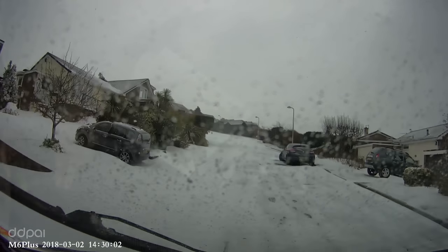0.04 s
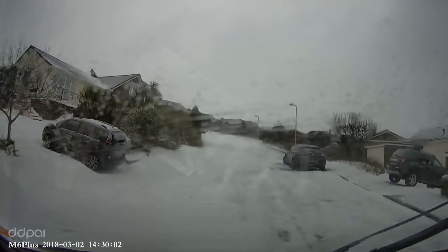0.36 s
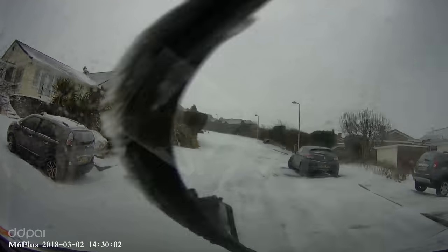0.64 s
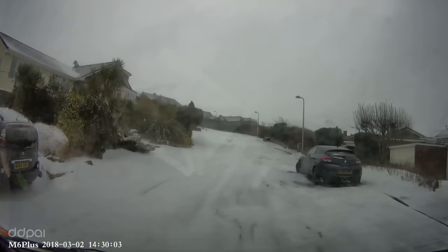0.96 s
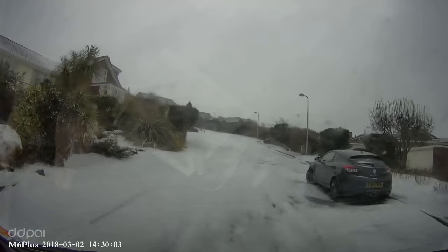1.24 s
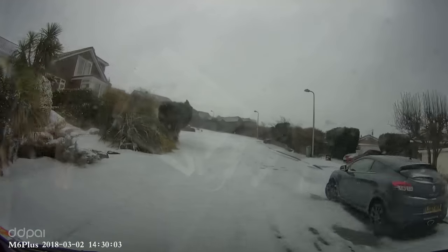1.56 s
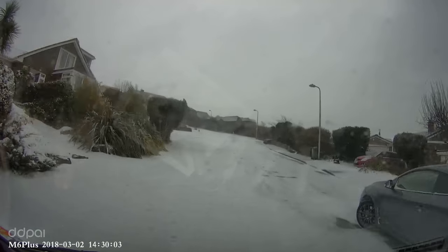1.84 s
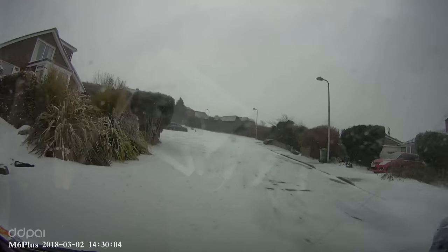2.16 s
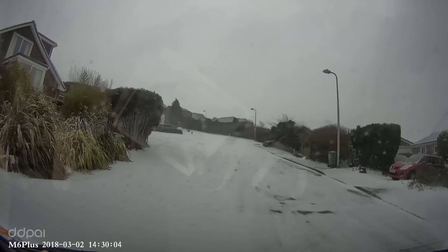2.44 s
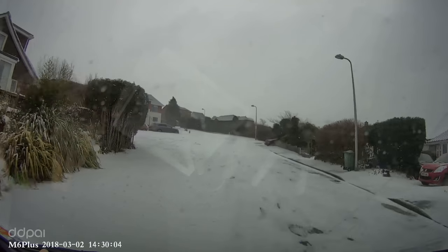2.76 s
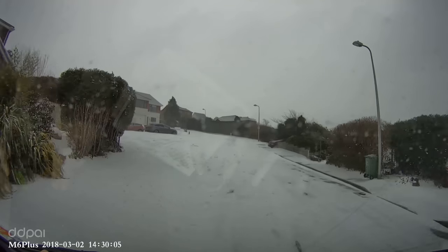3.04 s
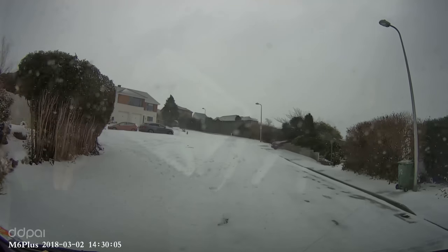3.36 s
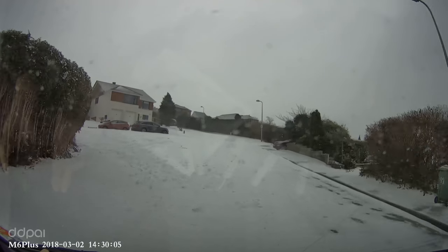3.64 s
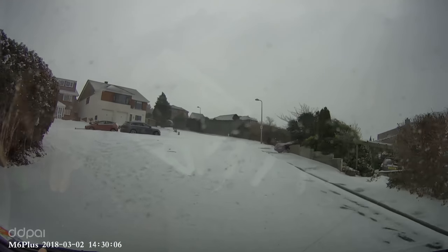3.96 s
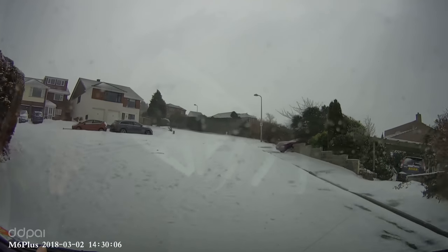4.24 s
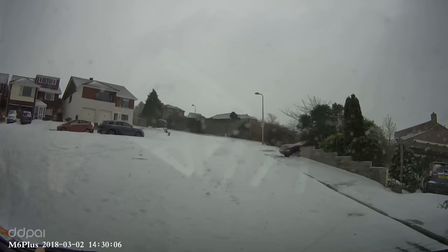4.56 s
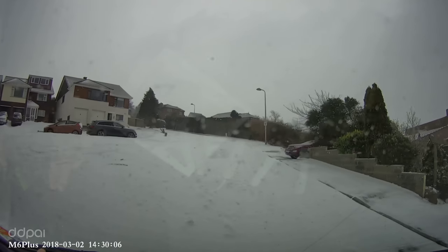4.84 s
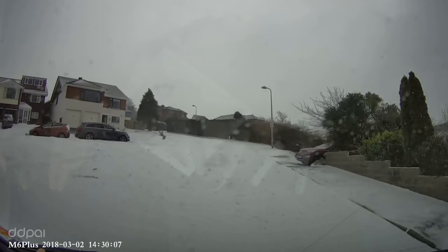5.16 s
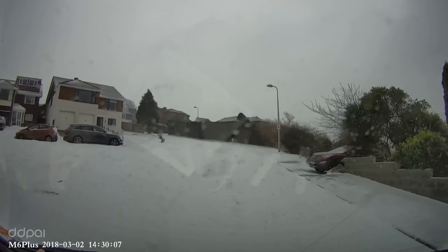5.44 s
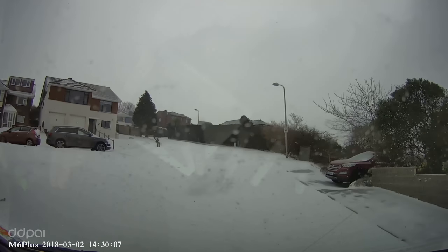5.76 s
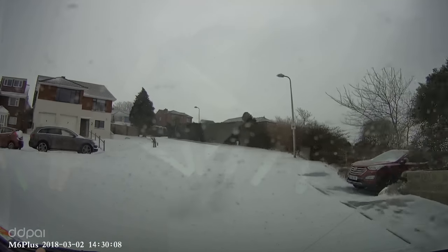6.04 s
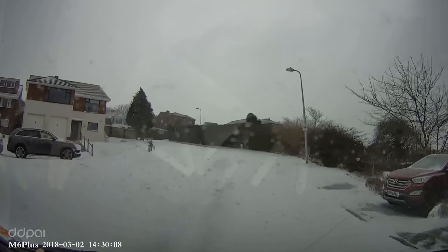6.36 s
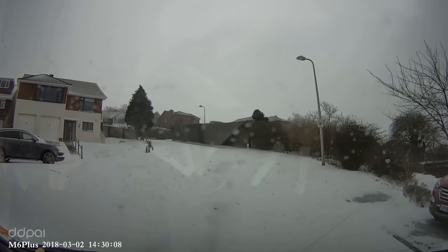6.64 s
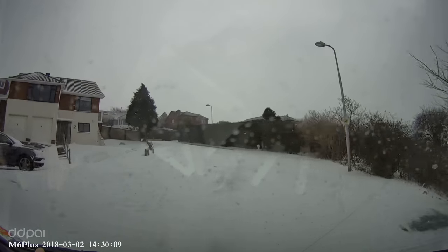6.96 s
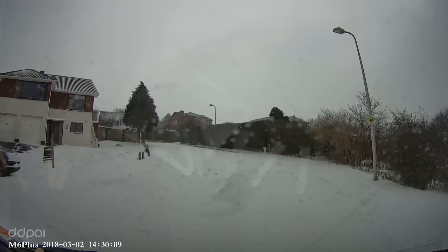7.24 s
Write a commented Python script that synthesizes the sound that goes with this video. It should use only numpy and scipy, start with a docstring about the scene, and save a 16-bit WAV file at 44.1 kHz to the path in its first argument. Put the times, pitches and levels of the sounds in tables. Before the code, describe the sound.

A short rubbery wiper groan, a bump and a sharp switch click open over the steady low rumble of a van's engine and tyres on packed snow. The heater blows quietly, with faint swishes of slush and a thin whine. From about halfway the ride gets bumpier, with dull knocks, small trim ticks and thumps that briefly overload the microphone. All is heard from the windscreen inside the cabin.

```python
"""Inside a van driving slowly up a snowy street, heard by a small microphone on the windscreen.
The heater blows, slush sprays, and packed snow shakes the body through the rumbling tyres.
The engine's firing makes the cabin boom; belt drive and gearbox whine faintly. The wipers groan
by stick-slip friction, then bump and scrape across the glass, and their stalk clicks off.
Trim ticks, lumps of snow knock underneath, and jolts briefly overload the microphone."""
import sys
import numpy as np
from scipy import signal
from scipy.fft import rfft, irfft
from scipy.io import wavfile
from scipy.ndimage import uniform_filter1d

SR = 44100
rng = np.random.default_rng(int(sys.argv[2]) if len(sys.argv) > 2 else 0)


def store_pcm(level_fs):
    """Save levels as 16-bit WAV."""
    pcm = np.round(np.clip(level_fs, -1, 1) * 32767).astype(np.int16)
    wavfile.write(sys.argv[1], SR, np.atleast_2d(pcm).T)


N = 326781
TIME = np.arange(N) / SR
FREQ = np.fft.rfftfreq(N, 1 / SR)


def amp(db):
    """Amplitude ratio of a level in decibels."""
    return 10 ** (np.asarray(db) / 20)


def unit(x):
    """Normalisation to rms 1."""
    return x / np.sqrt(np.mean(x ** 2) + 1e-20)


def curve(rows, column=1):
    """Linear interpolation of a table column over time."""
    columns = np.transpose(rows)
    return np.interp(TIME, columns[0], columns[column])


def add(mix, start_s, sound):
    """Superposition of a sound on the mix."""
    part = mix[max(round(start_s * SR), 0):][:len(sound)]
    part += sound[:len(part)]


def colour(x, spectrum):
    """Spectral shaping by (f/Hz, level/dB) points, with a steep roll-off beyond the ends."""
    hz, db = np.transpose(spectrum)
    log_f = np.log(np.fft.rfftfreq(len(x), 1 / SR) + 1)
    outside = np.maximum(np.log(hz[0]) - log_f, 0) + np.maximum(log_f - np.log(hz[-1]), 0)
    shape_db = np.interp(log_f, np.log(hz), db) - 60 * outside
    return irfft(rfft(x) * amp(shape_db), len(x))


def noise(spectrum, size=N):
    """Gaussian noise of rms 1 with a given spectral shape."""
    return unit(colour(rng.standard_normal(size), spectrum))


def drift(cutoff_hz):
    """Random modulation: low-pass noise of rms 1."""
    return unit(irfft(rfft(rng.standard_normal(N)) * (FREQ > 0) * np.exp(-(FREQ / cutoff_hz) ** 2), N))


def phase(hz):
    """Phase as the integral of frequency, from a random start."""
    return 2 * np.pi * (np.cumsum(hz) / SR + rng.random())


def ring(modes, size=8000):
    """Free vibration as a sum of damped modes."""
    t = np.arange(size) / SR
    return sum(amp(db) * np.exp(-np.log(1000) * t / t60) * np.sin(2 * np.pi * hz * t)
               * rng.choice([-1, 1]) for hz, db, t60 in modes)


def burst(spectrum, t60, size=8192):
    """Densely overlapping modes, treated as exponentially decaying noise."""
    return noise(spectrum, size) * np.exp(-np.log(1000) * np.arange(size) / SR / t60)


def spell(start, end, rise_s=0.086, fall_s=0.11):
    """Trapezoidal envelope of a tone."""
    return np.clip((TIME - start) / rise_s, 0, 1) * np.clip(1 - (TIME - end) / fall_s, 0, 1)


def softened(sound, rise_s):
    """Linear onset of a soft impact."""
    return sound * np.minimum(TIME[:len(sound)] / rise_s, 1)


def heater(level_db=-51, flutter_db=.5, half_width_hz=55):
    """Flow noise from the demister vents, coloured by duct resonances."""
    airflow = [(400, -5), (950, 1.5), (1450, -1), (1650, -3.5), (1950, -3), (2130, -0.5), (2430, -6),
               (2650, -3), (3200, -11), (4400, -17), (5000, -21.5), (6800, -27.5), (7600, -27.5),
               (8600, -34.5)]  # spectrum of the rushing air: f/Hz, level/dB
    ducts = [(1200, 2.5), (1460, 2.5), (1770, 1.5), (2130, 4), (2320, 5), (2530, 5.5), (2920, 3), (3390, 2),
             (3670, 2), (4420, 2)]  # resonances: f/Hz, gain/dB
    lift_db = sum(db * np.exp(-((FREQ - hz) / half_width_hz) ** 2) for hz, db in ducts)
    return amp(level_db + flutter_db * drift(40)) * unit(irfft(rfft(noise(airflow)) * amp(lift_db), N))


def slush(rise_s=.18, fall_s=.13, spatter_db=2.0):
    """Spray as amplitude-modulated noise: each patch of slush swells and decays in a spattering hiss."""
    patches = [(0.048, -62, 0.93), (.65, -68, 1), (2.3, -77.5, 0.93), (2.8, -71.5, 1), (3.73, -62, 0.99),
               (4.95, -65, 0.92), (6.08, -64, .7), (6.33, -68.5, .6), (6.69, -63.5, 0.88)]  # deepest points: t/s, level/dB, frequency ratio
    spray = [(1000, -3), (1800, 2), (3000, 0.5), (4400, 0), (5200, -2.5), (6500, -1.5), (7500, -2.5),
             (8600, -11)]  # spectrum of the hiss: f/Hz, level/dB
    out = np.zeros(N + SR)
    t = np.arange(2 * SR) / SR - 1  # one second either side of the deepest point
    swell = np.exp(-np.maximum(-t / rise_s, t / fall_s))
    for s, db, brightness in patches:
        hiss = noise([(hz * brightness, level) for hz, level in spray], len(t))
        add(out, s, amp(db) * swell * hiss)
    return out[SR:] * unit(amp(spatter_db * drift(80)))


def clods(level_db=-53, per_s=45, spread_db=1.5):
    """Shot noise: small clods thrown by the tread pat the underbody at random."""
    pat = [(300, 2.5), (550, -2.0), (800, -4.0), (1100, -16.5), (1600, -27.0)]  # f/Hz, level/dB
    strength = amp(spread_db * np.minimum(rng.exponential(1, N), 3))
    impacts = (rng.random(N) < per_s / SR) * rng.choice([-1, 1], N)
    return amp(level_db) * unit(colour(strength * impacts, pat))


def rattles(tick_db=-2, knock_db=-2):
    """Impact excitation: loose trim ticks, and soft lumps of snow set the wheel arches ringing."""
    ticks = [(.1, -56, 4200, .03), (0.61, -42, 4600, 0.037), (.616, -42, 4400, 0.023),
             (4.9055, -33, 2230, 0.024), (4.943, -45, 4700, .025), (5.1255, -44, 1990, 0.029),
             (5.709, -37.5, 2100, 0.034), (6.053, -43, 2200, 0.042), (6.281, -41, 1950, 0.04),
             (6.361, -44, 1900, .03), (6.45, -44, 2310, .03), (6.641, -42.5, 2000, .05),
             (6.707, -53, 2280, .04)]  # trim impacts: t/s, level/dB, centre f/Hz, T60/s
    knocks = [(0.611, -23), (1.069, -34), (2.174, -29), (3.338, -21), (3.401, -30), (4.68, -24.5)]  # snow impacts: t/s, level/dB
    arch_modes = [(398, 3, .03), (740, -3, 0.037), (814, -9, 0.05)]  # wheel arch: f/Hz, level/dB, T60/s
    splat = [(300, -3), (550, 0), (850, -5), (1100, -15.5), (1600, -23.5)]  # spectrum of a soft lump: f/Hz, level/dB
    tick_shape = [(.5, -12), (1, 0), (1.3, -12), (2, -16), (2.34, -21), (3, -24)]  # f/centre, level/dB
    out = np.zeros(N)
    for s, db, hz, t60 in ticks:
        tick = burst([(hz * ratio, level) for ratio, level in tick_shape], t60)
        add(out, s, amp(db + tick_db) * softened(tick, rise_s=.0013))
    for s, db in knocks:
        knock = ring(arch_modes, size=8192) + amp(-6) * burst(splat, t60=.03)
        add(out, s, amp(db + knock_db) * softened(knock, rise_s=.003))
    return out


def belt_drive(wobble=.0008, whine_waver_db=2.5, hum_waver_db=4.0):
    """A tone and its subharmonic: the belt sings in spells over a hum an octave below."""
    pitch = [(.9, 580), (1.4, 571), (2.5, 583), (3.3, 576), (4.05, 585), (6.7, 590), (7.41, 582)]  # whine: t/s, f/Hz
    spells = [(0.45, 1.697, -46, -45), (1.743, 2.206, -46.5, -33), (2.248, 2.763, -41.5, -42),
              (2.802, 4.048, -43.5, -43), (6.596, 7.5, -48.5, -62)]  # start t/s, end t/s, whine level/dB, hum level/dB
    pulley = phase(curve(pitch) * (1 + wobble * drift(5.1)))
    whine = amp(whine_waver_db * drift(4)) * np.sin(pulley)
    hum = amp(hum_waver_db * drift(2.4)) * np.sin(pulley / 2)
    return sum(spell(start, end) * (amp(whine_db) * whine + amp(hum_db) * hum)
               for start, end, whine_db, hum_db in spells)


def gearbox(start_s=6.45, mesh_hz=426, sag_hz_per_s=10, swell_db_per_s=13.5):
    """Gear-mesh tones: on the climb a whine swells and sinks in pitch, and a lower gear hums along."""
    climb_s = np.maximum(TIME - start_s, 0)
    mesh = phase(mesh_hz - sag_hz_per_s * climb_s)
    whine = amp(-48.5 + swell_db_per_s * climb_s) * np.sin(mesh)
    hum = amp(-39) * np.sin(.603 * mesh)
    return spell(start_s, TIME[-1]) * (whine + hum)


def tyres(lumps_db=0.8):
    """Structure-borne noise grows with the snow's unevenness; smooth snow crunches a little more."""
    unevenness = [(0, 0.5), (.9, -3), (2.45, -5), (2.7, -1), (3.5, 0.5), (3.9, 3), (4.4, 0.5), (5.12, -0.5),
                  (5.35, 5), (5.8, 4), (6.4, 5), (6.7, -3), (6.95, -4.5), (7.15, -3), (7.41, 1)]  # packed snow: t/s, level/dB
    body = [(10, -19.5), (18, -3), (25, 2), (31, 0), (39, 7), (50, -7.5), (62, -11), (90, -31.5)]  # spectrum of the shaking body: f/Hz, level/dB
    floor = [(45, -12.5), (56, -7), (65, -1.5), (76, -6.5), (92, -5.5), (115, -15)]  # spectrum of the drumming floor: f/Hz, level/dB
    tread = [(55, -22), (80, -9.5), (100, -3.5), (125, 1), (155, -4.5), (220, -3.5), (320, -9.5),
             (420, -11), (520, -21), (700, -36.5)]  # spectrum of the rolling tread: f/Hz, level/dB
    snow = [(300, -18), (450, -3), (560, -3.5), (660, -6), (760, -16.5), (900, -20.5), (1200, -33.5),
            (2000, -50)]  # spectrum of the crunching snow: f/Hz, level/dB
    uneven_db = curve(unevenness)
    shake = amp(-34 + .49 * uneven_db) * noise(body)
    drum = amp(-34.5 + .7 * uneven_db) * noise(floor)
    rumble = amp(-30.5 + .16 * uneven_db) * noise(tread)
    crunch = amp(-44 - .05 * uneven_db) * unit(noise(snow) * amp(lumps_db * drift(49)))
    return shake + drum + rumble + crunch


def engine(throb_db=1.15, waver_db=3, jitter=0.003):
    """Forced vibration: four cylinders drive the cabin at the firing rate and at weaker orders."""
    firing_rate = [(0, 73), (1.2, 75), (2.0, 76.5), (3.5, 75.5), (4.0, 74), (4.7, 74.3), (5.5, 73.5),
                   (7.41, 72.3)]  # engine speed: t/s, f/Hz
    load = [(0, -31), (.2, -23.5), (.45, -24.5), (.64, -32.5), (.84, -21), (1.0, -28), (1.1, -25),
            (1.42, -36), (1.55, -21), (1.72, -32.5), (1.87, -23.5), (2.02, -20), (2.18, -43), (2.32, -21),
            (2.55, -32.5), (3.15, -35), (3.35, -28.5), (4.33, -38.5), (4.58, -26.5), (4.88, -22.5),
            (5.1, -34), (5.38, -29), (5.7, -37.5), (7.41, -32)]  # engine load, heard as cabin boom: t/s, level/dB
    orders = [(.5, -49), (1.5, -41.5), (2, -53), (3, -46.5), (4, -46), (5, -54), (6, -56), (7, -50.5)]  # partials: multiple of the firing rate, level/dB
    firing = phase(curve(firing_rate) * (1 + jitter * drift(4.86)))
    boom = amp(curve(load) + throb_db * drift(18)) * np.sin(firing)
    partials = sum(amp(db + waver_db * drift(3.2)) * np.sin(order * firing + 2 * np.pi * rng.random())
                   for order, db in orders)
    early_drone = amp(-36) * spell(0, 2.8) * np.sin(1.25 * firing)
    return boom + early_drone + partials


def wiper_stalk(crack_db=9.5, ring_db=5, cabin_db=-18):
    """Impulse response: the switch snaps over and seats, its housing rings, the cabin reverberates."""
    blows = [(0.5642, -28), (.5676, -28.5), (0.5718, -33.5)]  # the snap and its seating: t/s, level/dB
    snap = [(400, -14), (650, -5), (820, -1), (1000, -.5), (1400, -3), (1900, -9), (2400, -2), (3500, -6.5),
            (5000, -12), (6400, -18), (7500, -26), (8800, -37)]  # spectrum of each blow: f/Hz, level/dB
    crack = [(900, -6), (1300, -1.5), (1900, -6), (2800, 3), (4500, 2), (6400, 2.5), (7300, -4),
             (8000, -13), (9000, -26)]  # spectrum of the first transient: f/Hz, level/dB
    housing_modes = [(595, -9, .06), (695, 3.5, .06), (845, 4.5, .06), (1090, -11, .035), (1170, -11, .04),
                     (1400, -11, .04), (1570, -17, .035), (2080, -16, .04), (2228, -14, .06),
                     (2457, -11, .05), (2654, -15, .065), (2821, -12, .05), (3085, -14, .053),
                     (3214, -15, .055), (3431, -15, .065), (3625, -13, .05), (3860, -13, .04),
                     (4301, -19, .059), (4980, -21, .05), (5652, -26, .045), (6350, -24, .03)]  # f/Hz, level/dB, T60/s
    out = np.zeros(N)
    for s, db in blows:
        add(out, s, amp(db) * (burst(snap, t60=.053) + amp(cabin_db) * burst(snap, t60=.14)))
    s, db = blows[0]
    add(out, s, amp(db + crack_db) * burst(crack, t60=.0065))
    add(out, s, amp(db + ring_db) * ring(housing_modes))
    return out


def wipers(chatter_db=1.5, rub_db=-4, jitter=.08, spread_db=2, bump_s=0.4, bump_db=-27.5):
    """Stick-slip friction: the rubber blades groan, then bump and scrape across the ringing glass."""
    chatter = [(0, 97, -20), (.04, 105.6, -25), (.11, 115, -24.5), (.15, 114, -29.5), (.2, 100, -33.5),
               (.26, 115, -96)]  # blades turning round: t/s, slip rate f/Hz, level/dB
    glass_modes = [(125, -1, 0.059), (224, 0, 0.15), (357, -0.5, 0.062), (393, -6.5, 0.059),
                   (476, -9.5, 0.12), (590, -14.5, .05), (830, -17, 0.044), (1140, -25, 0.024)]  # windscreen: f/Hz, level/dB, T60/s
    rub = [(90, 2.5), (130, 7), (250, 3.5), (400, -6.5), (650, -17.5), (850, -12), (1000, -29.5),
           (2000, -31.5)]  # spectrum of rubber dragged on glass: f/Hz, level/dB
    stroke = [(.28, -62), (.36, -48), (.43, -42), (.52, -44), (.6, -70.5)]  # envelope of the scrape: t/s, level/dB
    scrape = [(300, -8.5), (520, 1), (820, 1.5), (950, -13.5), (1500, -20.5)]  # spectrum of the scrape: f/Hz, level/dB
    cycles = phase(curve(chatter) * (1 + jitter * drift(60))) / (2 * np.pi)
    slips = np.diff(np.floor(cycles), prepend=0) * amp(spread_db * drift(80))  # one impulse a cycle
    groan = unit(signal.oaconvolve(slips, ring(glass_modes))[:N])
    out = amp(chatter_db + curve(chatter, column=2)) * (groan + amp(rub_db) * noise(rub))
    out += amp(curve(stroke)) * noise(scrape)
    add(out, bump_s, amp(bump_db) * ring(glass_modes))
    return out


def scene():
    """Superposition of all sources in the cabin, in one channel."""
    driving = engine() + belt_drive() + gearbox() + tyres() + slush() + clods()
    return (driving + heater() + wipers() + wiper_stalk() + rattles())[None]


def record(dry, rise_s=0.0011, leak=0.12, hiss_db=-72, cutoff_hz=8900):
    """Overload: jolts pin the microphone, leaving soft thumps; it also adds hiss and limits the band."""
    overloads = [(2.805, 0.004, 0.08), (3.384, 0.003, -0.05), (3.783, 0.006, 0.1), (3.809, 0.01, -0.04),
                 (3.831, 0.009, 0.11), (4.363, 0.006, 0.07), (4.845, 0.005, 0.14), (4.921, 0.011, -0.14),
                 (4.945, 0.011, 0.13), (4.984, 0.006, -0.05), (5.292, 0.004, 0.07), (5.367, 0.006, 0.15),
                 (5.391, 0.011, -0.12), (5.412, 0.006, 0.09), (5.831, 0.008, 0.11), (6.019, 0.01, 0.12),
                 (6.374, 0.008, -0.07), (7.103, 0.005, 0.09)]  # jolts: t/s, duration/s, signed thump amplitude
    self_noise = [(1000, -1.5), (6800, -3.5), (7500, -9), (8600, -16.5)]  # spectrum of the hiss: f/Hz, level/dB
    response = [(0, -1), (6400, -1), (7000, -4), (7600, -8.5), (8300, -13), (9000, -22)]  # treble loss: f/Hz, gain/dB
    pinned, thumps = np.zeros(N), np.zeros(N)
    rise_times = np.arange(SR // 50) / SR / rise_s
    for s, duration, height in overloads:
        add(pinned, s, np.ones(round(duration * SR)))
        add(thumps, s, height * rise_times * np.exp(1 - rise_times))
    pinned = uniform_filter1d(uniform_filter1d(np.minimum(pinned, 1), size=30), size=30)
    heard = dry * (1 - (1 - leak) * pinned) + uniform_filter1d(thumps, size=20)
    heard += amp(hiss_db) * noise(self_noise)
    heard *= signal.windows.tukey(N, .001)
    heard = irfft(rfft(heard) * amp(np.interp(FREQ, *np.transpose(response))), N)
    low_pass = signal.firwin(255, cutoff_hz, window=("kaiser", 9), fs=SR)
    return signal.oaconvolve(heard, low_pass[None], "same")


dry = scene()
out = record(dry)
store_pcm(out)
```